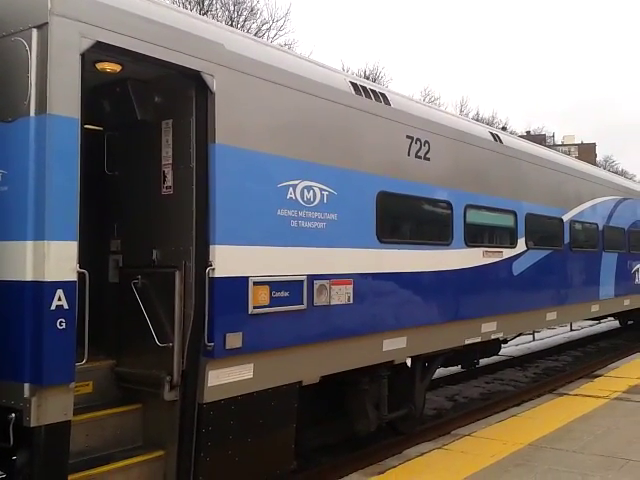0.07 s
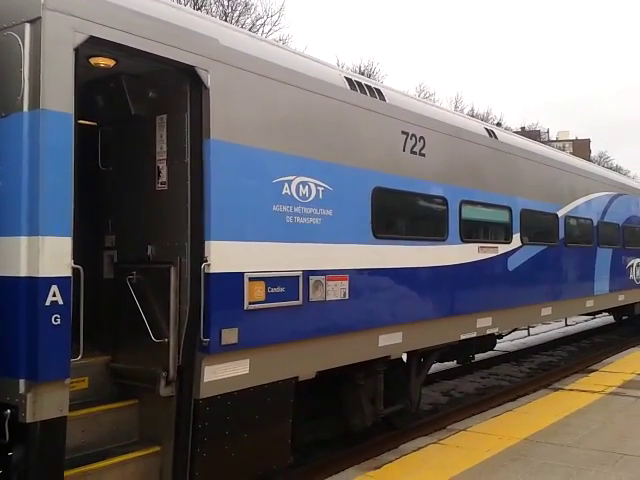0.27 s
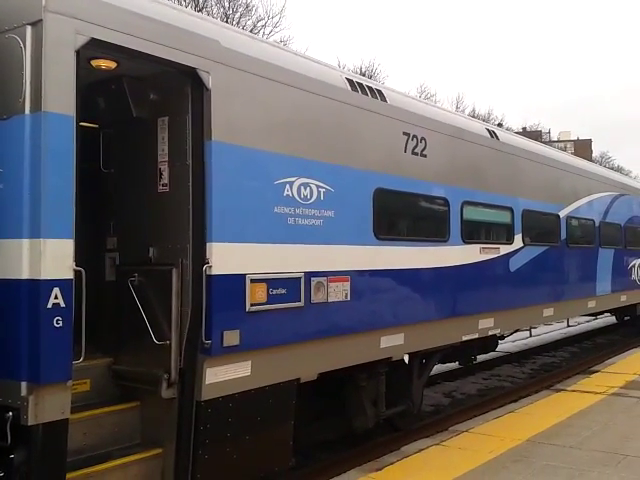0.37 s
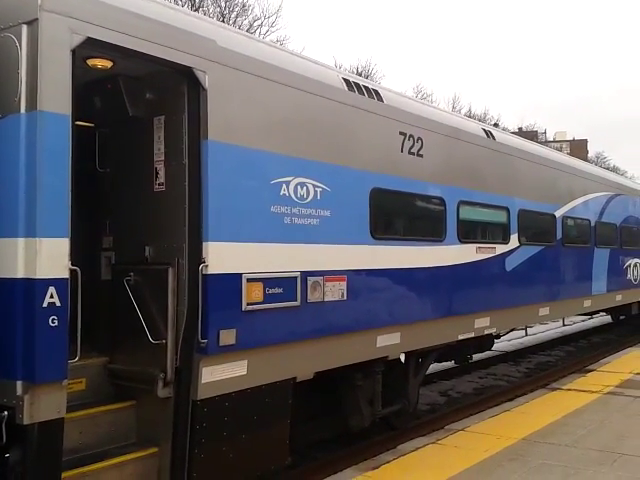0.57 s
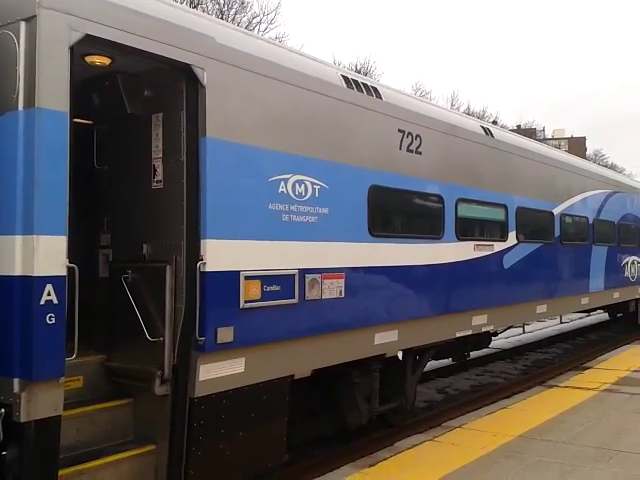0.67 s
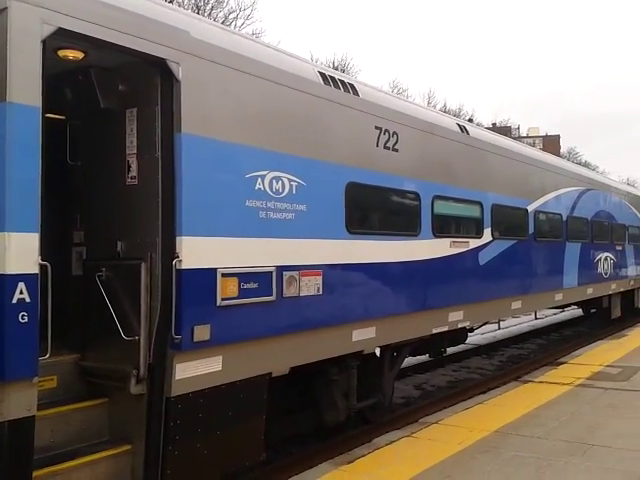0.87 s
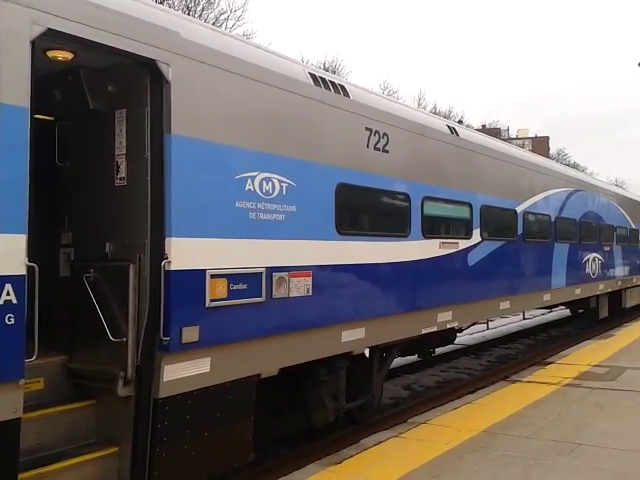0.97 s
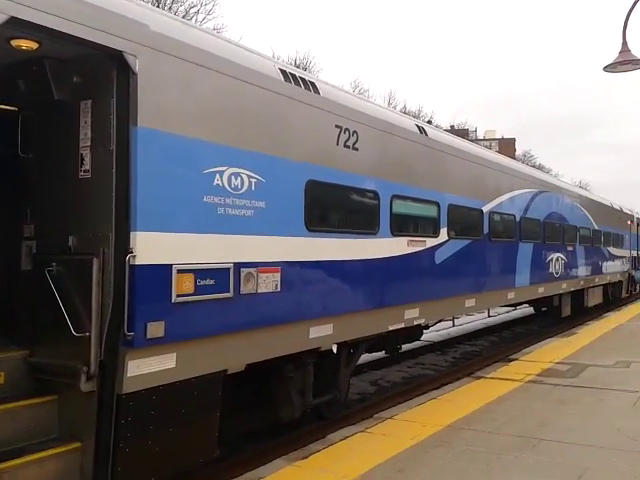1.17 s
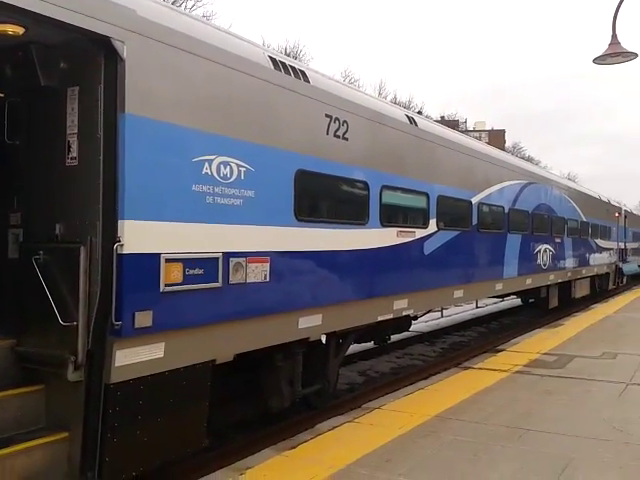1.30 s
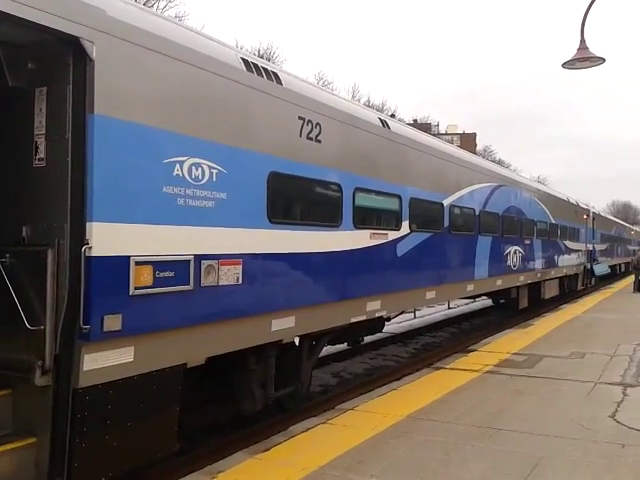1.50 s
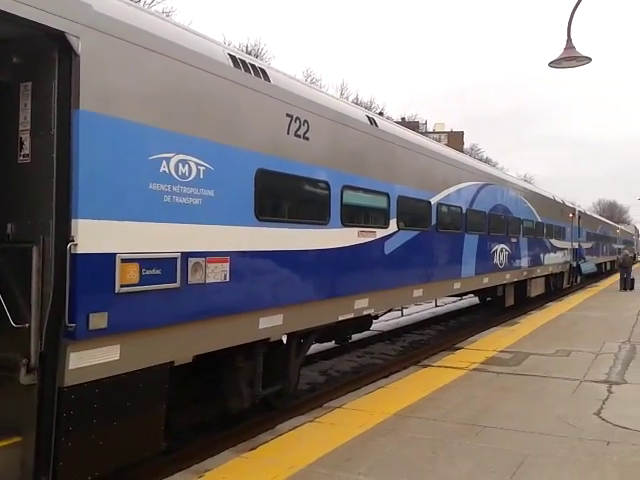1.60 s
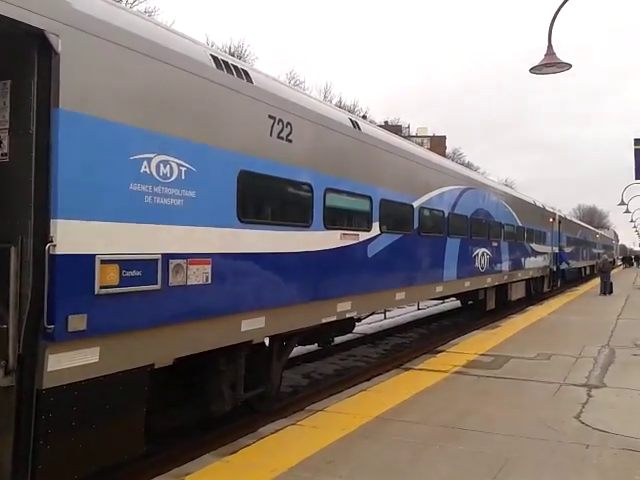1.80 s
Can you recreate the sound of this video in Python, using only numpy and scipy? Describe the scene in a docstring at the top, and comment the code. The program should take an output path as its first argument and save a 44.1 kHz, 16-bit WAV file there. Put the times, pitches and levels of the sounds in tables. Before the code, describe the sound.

A standing commuter train releases brake air in one short, very loud hiss with a whistling edge. It echoes briefly around the open platform, then a faint puff and tick follow. Fans run throughout, and the microphone is lightly bumped.

```python
"""Train air brake venting at an open platform

A standing commuter train vents its brake in one short, very loud blast. The jet rings the vent pipe,
a weaker hiss bleeds off, and the station echoes. A faint puff of air comes before, another with a
valve tick after. The train's fans run throughout; the hand-held microphone is bumped lightly."""
import sys
import numpy as np
from scipy import signal
from scipy.fft import rfft, irfft
from scipy.io import wavfile
from scipy.ndimage import uniform_filter1d

SR = 44100
rng = np.random.default_rng(int(sys.argv[2]) if len(sys.argv) > 2 else 0)


def master(y):
    """Save y as 16-bit WAV."""
    cut = np.clip(np.atleast_2d(y).T, -1, 1)
    pcm = np.round(cut * 32767)  # scale
    wavfile.write(sys.argv[1], SR, pcm.astype(np.int16))


N = 81585
OPEN_S, SHUT_S, RISE_S = 0.2198, 0.29, 0.022  # brake valve


def amp(db):
    """Decibels to gain."""
    return 10 ** (np.asarray(db) / 20)


def unit(x):
    """Scale to rms 1."""
    return x / np.sqrt(np.mean(x ** 2) + 1e-20)


def clock():
    """Time/s."""
    return np.arange(N) / SR


def lookup(points, hz):
    """Interpolate a table over log frequency."""
    f, value = np.transpose(points)
    return np.interp(np.log(hz + 1), np.log(f + 1), value)


def filtered(x, gain):
    """Zero-phase filter with response gain(f/Hz)."""
    return irfft(rfft(x, 2 * N) * gain(np.fft.rfftfreq(2 * N, 1 / SR)))[:N]


def coloured(x, points):
    """Filter by a table of f/Hz, gain/dB."""
    return filtered(x, lambda f: amp(lookup(points, f)))


def highpass(x, hz):
    """The part of x above hz."""
    return filtered(x, lambda f: 1 - 1 / (1 + (f / hz) ** 4))


def hum(hz, width_hz):
    """Turbulence in one resonance, rms 1."""
    return unit(filtered(rng.standard_normal(N), lambda f: 1 / (1 + (2 * (f - hz) / width_hz) ** 2)))


def whistle(hz, width_hz):
    """Driven resonance: steady strength, wandering phase, rms 1."""
    drift = uniform_filter1d(rng.standard_normal(N), size=60) * np.sqrt(2 * np.pi * width_hz / SR)
    return np.sqrt(2) * np.cos(2 * np.pi * (hz * clock() + rng.random()) + np.cumsum(drift))


def knock(start_s, rise_s):
    """Impact envelope: peaks at 1 after rise_s, dies quickly."""
    age = np.maximum(clock() - start_s, 0) / rise_s
    return age * np.exp(1 - age)


def fans():
    """Slightly patchy rush of air with broad hums; the treble dulls as the microphone turns."""
    # rush spectrum: f/Hz, relative level/dB
    spectrum = [(25, -32), (55, -36), (100, -17.5), (155, -11), (260, -3), (370, -2.5), (480, -6.5),
                (700, -1.5), (1020, 0), (1300, -4.5), (1750, -3.5), (2200, -9), (2650, -9.5), (3050, -11.5),
                (4000, -18.5), (5000, -23), (6000, -32.5), (7700, -42.5), (9900, -36), (11500, -41),
                (17000, -38.5)]
    # fan resonances: f/Hz, width/Hz, level/dB
    hums = [(382.3, 16, -55), (1023, 110, -52), (2560, 71, -63)]
    # treble lift: t/s, gain/dB
    treble_lift = [(0, 3), (.2, 4), (.8, 2.5), (1.151, 2.5), (1.5, 0.5), (1.85, 1.5)]
    _, _, bins = signal.stft(rng.standard_normal(N), SR, nperseg=1024, noverlap=768)
    patches = uniform_filter1d(rng.standard_normal(bins.shape), size=10, axis=0)
    patches_db = 0.87 * unit(uniform_filter1d(patches, size=14, axis=1))
    air = signal.istft(bins * amp(patches_db), SR, nperseg=1024, noverlap=768)[1][:N]
    rush = amp(-35.5) * unit(coloured(air, spectrum))
    rush += sum(amp(db) * hum(hz, width_hz) for hz, width_hz, db in hums)
    treble = highpass(rush, hz=1430)
    return rush - treble + treble * amp(np.interp(clock(), *np.transpose(treble_lift)))


def puffs():
    """Two small air leaks swell and fade; a valve ticks in the second."""
    # leaks: peak t/s, rise/s, fall/s, level/dB
    leaks = [(.01, .03, 0.047, -41.5), (.995, 0.037, 0.04, -37.5)]
    # leak spectrum: f/Hz, relative level/dB
    spectrum = [(500, -33), (2000, -3), (3300, 1), (4200, -5), (5300, -5.5), (6500, -21.5), (8500, -29),
                (13000, -20), (17000, -34)]
    t = clock()
    flow = sum(amp(db) * np.exp(-((t - peak_s) / np.where(t < peak_s, rise_s, fall_s)) ** 2 / 2)
               for peak_s, rise_s, fall_s, db in leaks)
    tick = amp(-25) * knock(start_s=0.9783, rise_s=0.0013) * whistle(hz=3600, width_hz=203)
    return flow * unit(coloured(rng.standard_normal(N), spectrum)) + tick


def valve(start_s, rise_s, fall_db_per_s):
    """Flow envelope: surges, holds, dies away once the valve shuts."""
    t = clock()
    opening = np.clip((t - start_s) / rise_s, 0, 1) ** 1.6
    return opening * amp(-fall_db_per_s * np.maximum(t - SHUT_S, 0))


def blast():
    """Jet, ringing vent pipe and pressure thump; the highest hiss needs full flow and comes last."""
    # underframe and platform edge reflections: delay/s, gain
    reflections = [(.0023, .3), (.0047, -.32), (.0079, .3), (0.0114, -.25)]
    # jet spectrum: f/Hz, relative level/dB
    spectrum = [(25, -53), (90, -49), (200, -20), (380, -14), (520, -8), (750, -7.5), (1150, -7.5),
                (1600, -3), (2300, -4.5), (2650, 1.5), (3450, 3.5), (3800, -4), (5400, -1), (6150, -8),
                (6900, -5), (7800, -15.5), (9700, -11), (11000, -16), (12500, -11.5), (13300, -18.5),
                (17000, -17)]
    # vent pipe resonances: f/Hz, width/Hz, level/dB
    pipe_modes = [(672, 33.9, -27.5), (952.6, 27, -29.5), (1542, 40, -25.5), (1684, 39, -29),
                  (1945, 24, -24), (2567, 15.7, -19), (2745, 26, -23), (2810, 11, -20.5), (2973, 10.4, -26),
                  (2990, 17, -24.5), (3090, 34.4, -25.5), (3128, 18.3, -14), (3263, 18, -21.5),
                  (3310, 26, -20.5), (3450, 29, -20.5), (3513, 46, -21.5), (3530, 35, -21.5),
                  (4087, 17, -23.5), (4708, 44, -27.5), (5174, 21.6, -25.5), (5215, 32, -27.5),
                  (5790, 17, -35), (6780, 86, -31)]
    noise = rng.standard_normal(N)
    noise += sum(gain * np.roll(noise, round(delay_s * SR)) for delay_s, gain in reflections)
    jet = amp(-7.5) * unit(coloured(noise, spectrum))
    jet += sum(amp(db) * whistle(hz, width_hz) for hz, width_hz, db in pipe_modes)
    treble = highpass(jet, hz=5900)
    body = (jet - treble) * valve(OPEN_S, RISE_S, fall_db_per_s=274)
    hiss = treble * valve(OPEN_S + 0.001, rise_s=0.03, fall_db_per_s=283)
    thump_s, thump_width_s, thump_hz = 0.26, 0.0056, 55.7
    offset_s = clock() - thump_s
    thump = amp(-39) * np.exp(-(offset_s / thump_width_s) ** 2) * np.cos(2 * np.pi * thump_hz * offset_s)
    return thump + body + hiss


def afterring():
    """Pipe tones that start with the blast and ring on faintly."""
    # slow-decaying pipe resonances: f/Hz, width/Hz, level/dB
    pipe_modes = [(3070, 10.6, -35), (3140, 16, -29.5), (3274, 11, -30)]
    tones = sum(amp(db) * whistle(hz, width_hz) for hz, width_hz, db in pipe_modes)
    return tones * valve(OPEN_S, RISE_S, fall_db_per_s=56)


def echo(delay_s):
    """Response of one smeared reflection; air absorbs more treble on a longer path."""
    smear_t60_s, air_db_per_s_khz = 0.018, 2
    age_s = clock() - delay_s
    smear = rng.standard_normal(N) * (age_s > 0) * amp(-60 * abs(age_s) / smear_t60_s)
    return filtered(unit(smear), lambda f: amp(-air_db_per_s_khz * delay_s * f / 1000))


def station(x):
    """Echoes of x off cars and buildings, plus a thin tail that loses its treble first."""
    # echo paths: delay/s, gain/dB
    paths = [(.06, -17.5), (0.191, -31), (.35, -30.5)]
    # echo filter: f/Hz, gain/dB
    echo_colour = [(100, -26), (600, -6), (1300, -6), (1900, 8), (2700, -5), (3400, 5), (3900, 0),
                   (5300, -2), (6600, -9), (12000, -9), (17000, -13)]
    # open-air reverberation spectrum: f/Hz, gain/dB
    tail_colour = [(100, -23), (700, -24), (1800, -11), (2850, -14.5), (3250, -13), (3500, -17.5),
                   (4000, -14), (5400, -16), (6800, -15), (8500, -11), (16000, -16)]
    # reverberation time: f/Hz, T60/s
    tail_t60 = [(200, .7), (1500, 2), (3200, 1.2), (5000, 1.13), (6800, 0.59), (12000, 0.36), (17000, .25)]
    echoes = sum(amp(db) * echo(delay_s) for delay_s, db in paths)
    hz, t, bins = signal.stft(rng.standard_normal(N), SR, nperseg=256)
    decay = amp(-60 * t / lookup(tail_t60, hz)[:, None])
    decay /= np.sqrt(np.mean(decay ** 2, axis=1, keepdims=True))
    tail_bins = bins * decay * amp(lookup(tail_colour, hz))[:, None]
    tail = signal.istft(tail_bins, SR, nperseg=256)[1][:N]
    response = (coloured(echoes, echo_colour) + tail) / np.sqrt(N)
    return signal.fftconvolve(x, response)[:N]


def bleed():
    """The last air hisses out, sagging slowly, and stops as the valve seats."""
    # hiss spectrum: f/Hz, relative level/dB
    spectrum = [(100, -45), (500, -20), (900, -12), (1400, -13.5), (1900, -2), (2400, -5), (3100, 0),
                (3700, 2), (4300, 0.5), (5300, -5.5), (5800, -10.5), (6400, -25), (7500, -23.5),
                (10000, -20.5), (12500, -20), (14000, -27), (17000, -27)]
    start_s, rise_s, seat_s = 0.28, 0.038, 0.41
    sag_db_per_s, fall_db_per_s = 27.5, 330
    t = clock()
    onset = np.clip((t - start_s) / rise_s, 0, 1)
    level_db = -16.5 - sag_db_per_s * (t - start_s) - fall_db_per_s * np.maximum(t - seat_s, 0)
    return onset * amp(level_db) * unit(coloured(rng.standard_normal(N), spectrum))


def bumps():
    """Low handling knocks on the microphone, damped within a cycle or two."""
    # knocks: t/s, level/dB, f/Hz
    hits = [(.417, -32, 197), (.575, -30, 164), (1.446, -28, 356), (1.474, -30, 260), (1.483, -28, 290),
            (1.493, -30, 180), (1.506, -28.5, 203), (1.514, -29, 269), (1.523, -25, 177),
            (1.53, -26.5, 313)]
    knocks = sum(amp(db) * knock(start_s, rise_s=0.0017) * np.cos(2 * np.pi * hz * (clock() - start_s))
                 for start_s, db, hz in hits)
    return highpass(knocks, hz=103)


def scene():
    """Mono mix; only blast and bleed excite the station echoes."""
    vented = blast() + bleed()
    return (vented + station(vented) + afterring() + puffs() + fans() + bumps())[None]


def record(dry):
    """Soft overload on the blast, no deep bass in the distortion; then a band limit."""
    clipped = dry[0] / (1 + dry[0] ** 12) ** (1 / 12)
    overloaded = dry + highpass(clipped - dry[0], hz=170)
    lowpass = signal.firwin(511, cutoff=17150, window=("kaiser", 9), fs=SR)
    return signal.oaconvolve(overloaded, lowpass[None], "same")


dry = scene()
out = record(dry)
master(out)
```